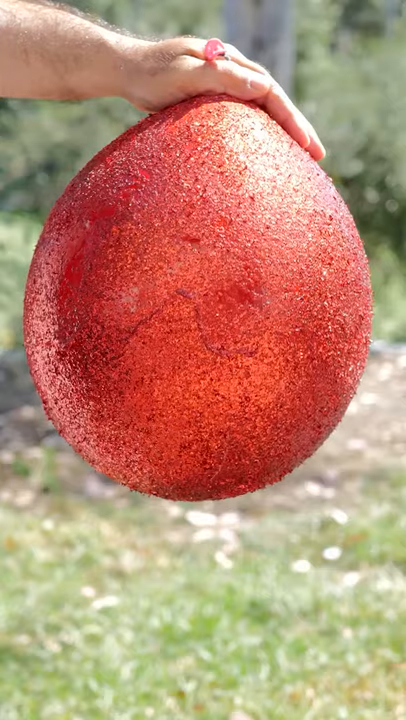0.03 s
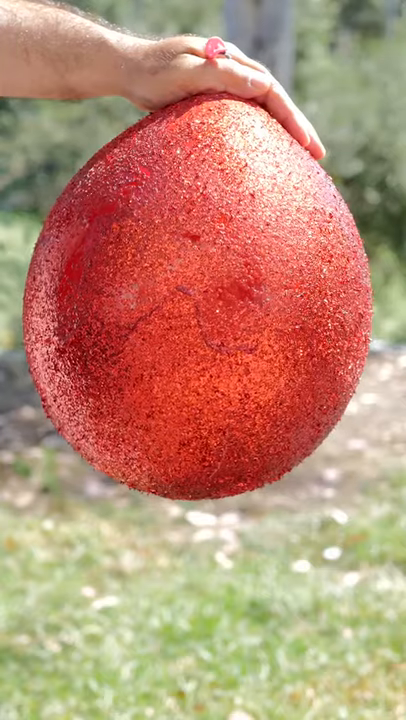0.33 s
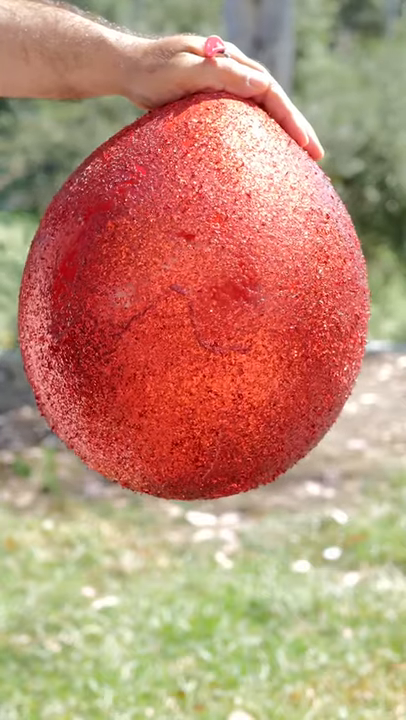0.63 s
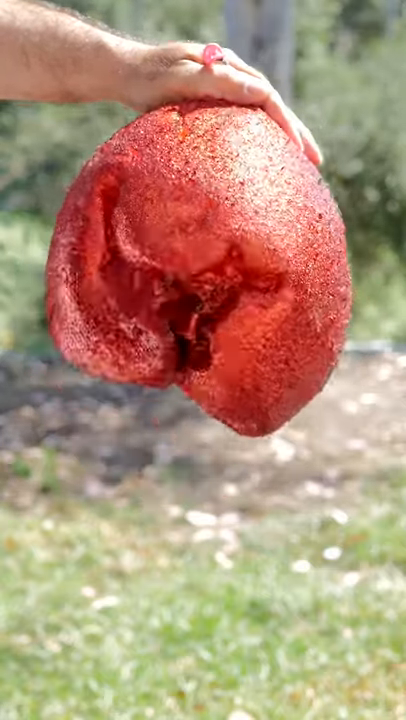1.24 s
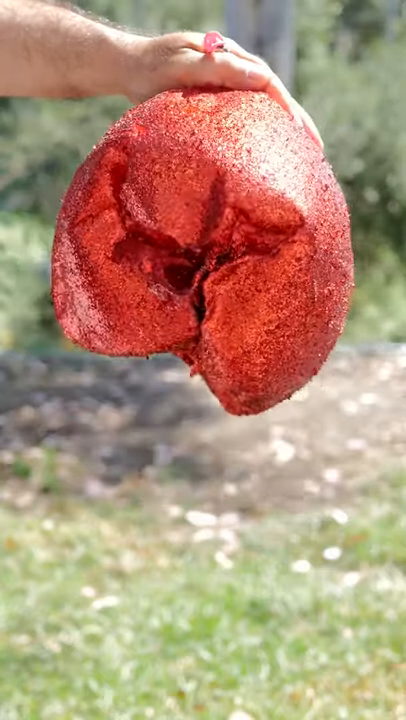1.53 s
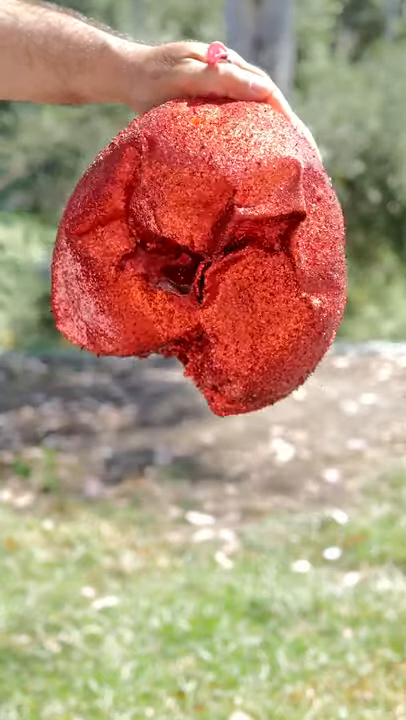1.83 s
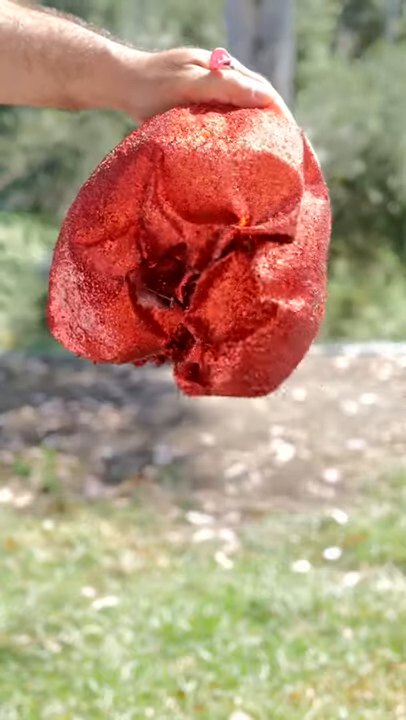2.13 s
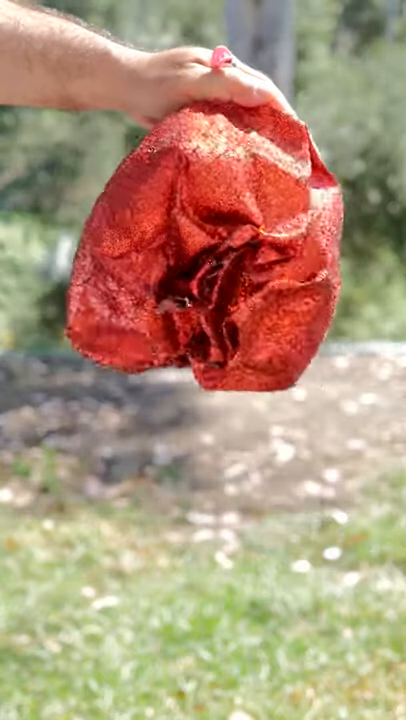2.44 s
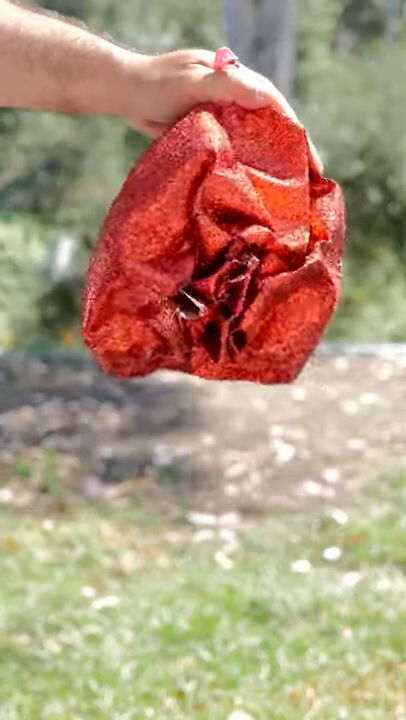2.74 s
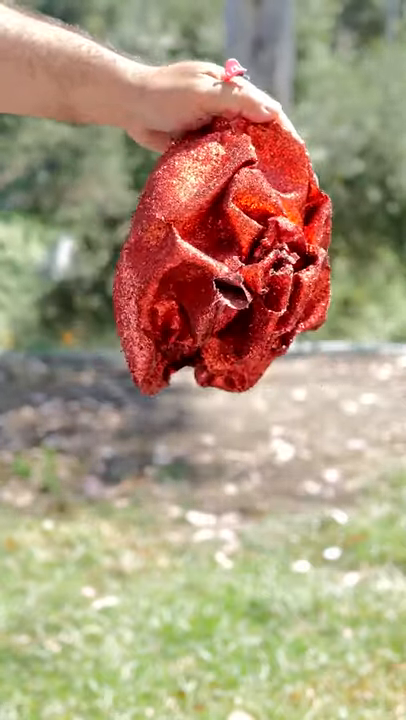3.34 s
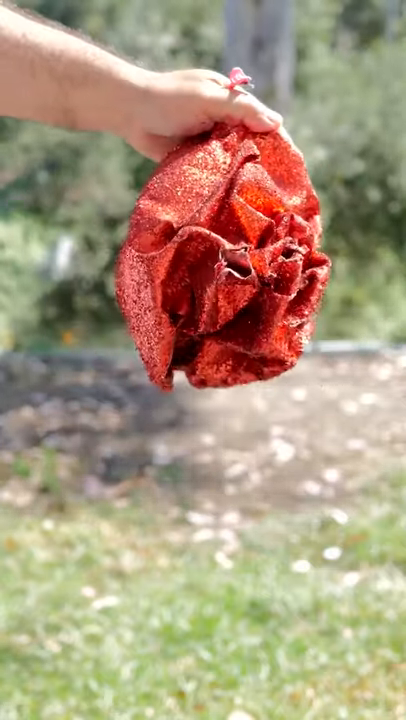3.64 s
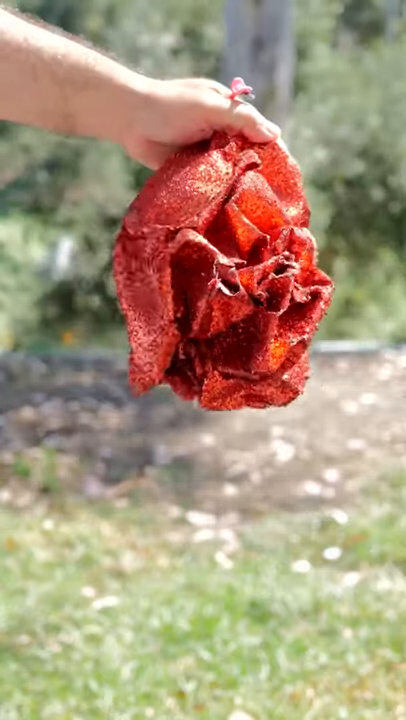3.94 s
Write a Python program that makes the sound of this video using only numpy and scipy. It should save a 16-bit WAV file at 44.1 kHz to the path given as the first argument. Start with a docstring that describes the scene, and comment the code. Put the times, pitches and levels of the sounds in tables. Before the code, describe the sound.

A glitter-coated balloon crackles and crumples close to the microphone in a garden. At first there are only faint birds, a low rumble and a soft hand bump. At 0.9 seconds it is punctured, ripping with a sharp snap just after. Dense, fine crackling continues until 4 seconds, with hollow pops of buckling folds growing from about 2 seconds. One bird chirps regularly until about 2.8 seconds.

```python
"""A garden, in stereo: birds call from the trees over a faint rumble, and a hand bumps a glitter-coated
balloon held close to the microphone. At 0.9 s it is punctured and the hole rips wider. The skin shrinks
and its stiff coating crackles in thousands of tiny fractures. Folds buckle one after another and ring
the hollow shell, more and more as it crumples from about 2 s on."""
import sys
import numpy as np
from scipy import signal
from scipy.fft import rfft, irfft, next_fast_len
from scipy.io import wavfile
from scipy.ndimage import uniform_filter1d, map_coordinates

SR = 44100
rng = np.random.default_rng(int(sys.argv[2]) if len(sys.argv) > 2 else 0)


def master_out(mix):
    """Clip the mix to full scale and print it as 16-bit PCM to the path in sys.argv[1]."""
    frames = np.transpose(np.atleast_2d(mix))
    ceiling = np.clip(frames, -1, 1)
    pcm = np.round(ceiling * 32767).astype(np.int16)
    wavfile.write(sys.argv[1], SR, pcm)


N = 176400
T = np.arange(N) / SR

# spectrum of the garden air: f/Hz, relative level/dB
AIR_SPECTRUM = [(15, -57), (30, -36), (85, -5), (117, 7), (180, -1), (344, -0.5), (1420, -7.5), (4260, -4),
                (5570, -26), (6900, -11.5), (12000, -53)]
# how alike the air is in the two channels: f/Hz, correlation
AIR_CORRELATION = [(600, 0.99), (1400, 0.54)]
# side the air leans to: f/Hz, left over right/dB
AIR_PAN = [(600, 0), (2300, -4), (7000, 12.5)]
# thin far trills: t/s, length/s, f/Hz, relative level/dB
FAR_TRILLS = [(0.203, 0.41, 3062, -48.5), (.4, 0.61, 4370, -53)]
# faint high peeps: t/s, starting f/Hz
FAR_PEEPS = [(.319, 3440), (.77, 5160)]
# slurred whistles, farther off to the right: t/s, starting f/Hz
FAR_WHISTLES = [(.19, 2200), (.2, 3100), (.352, 2390), (.415, 2433), (.49, 2340), (.622, 2130),
                (.782, 2113)]
# falling chirps of the near bird: t/s
NEAR_CHIRPS = [.236, .552, .885, 1.183, 1.496, 1.815, 2.137, 2.452, 2.775]
# bumps of the hand on the balloon: t/s, relative level/dB, fall/s
HAND_BUMPS = [(.443, -41, 0.051), (0.96, -27.5, 0.029), (1.965, -47, 0.11), (2.817, -39.5, 0.034)]
# spectrum of a bump: f/Hz, relative level/dB
BUMP_SPECTRUM = [(40, -16), (75, -0.5), (170, 5.5), (225, -4.5), (900, -34)]
# fine crackle of the shrinking skin: t/s, relative level/dB
SHRINK_LEVEL = [(.915, -69), (.926, -47), (.97, -43), (.995, -34), (1.15, -40.5), (1.25, -32.5),
                (1.52, -33.5), (1.72, -32), (1.92, -31.5), (2.04, -35), (2.15, -32), (2.48, -30.5),
                (2.68, -35.5), (2.76, -28), (3.18, -29), (3.26, -35), (3.88, -34.5), (4, -41.5)]
# coarser rustle of the creases: t/s, relative level/dB
CREASE_LEVEL = [(.91, -59), (.93, -44), (1.15, -52.5), (1.27, -46), (2.22, -43), (2.8, -37.5), (3.15, -38),
                (3.87, -39.5), (4, -44)]
# lengthening creases: t/s, length/s, starting f/Hz, relative level/dB
CREASE_RUNS = [(1.235, .12, 3170, -41), (1.539, 0.1, 3160, -41), (2.799, 0.2, 3130, -42),
               (3.075, .075, 2100, -39)]
# spectrum of the fine fractures: f/Hz, relative level/dB
CRACKLE_SPECTRUM = [(1500, -64.5), (3500, -5), (7200, -3), (9200, 4.5), (12000, 5.5), (15500, -6.5)]
# spectrum of the coarse fractures: f/Hz, relative level/dB
CRACK_SPECTRUM = [(400, -34.5), (1200, -11), (2100, 6.5), (3900, 4), (4900, -2), (12000, -4)]
# snap and rasp of the ripping skin: t/s, relative level/dB, rise/s, fall/s
RIP_BURSTS = [(1.073, -17, 0.0038, 0.0023), (1.083, -27.5, 0.018, 0.022)]
# spectrum of the rip: f/Hz, relative level/dB
RIP_SPECTRUM = [(1300, -14), (2900, 2), (4000, 10), (5400, -4.5), (9500, 6), (15500, -7)]
# cavity modes of the shell: f/Hz, relative level/dB
CAVITY_MODES = [(420, 5), (520, 2), (810, 2), (900, -1.5), (1240, -0.5), (1410, -2.5), (1600, -3),
                (2080, 8), (2380, 5), (2800, -0.5)]
# buckling folds: t/s, length/s, relative level/dB of crackle, of crack and of ring, ring centre f/Hz
BUCKLES = [(.926, .024, -52, -41, -25.5, 440), (1.001, 0.012, -25, -56, -37, 830),
           (1.534, 0.011, -25, -30, -60, 430), (1.698, 0.024, -25, -32, -56, 430),
           (1.747, .0025, -17.5, -28, -37, 2080), (1.852, 0.022, -26.5, -36, -54, 430),
           (1.9, 0.026, -21.5, -28, -30, 1450), (1.971, .013, -21, -26.5, -21.5, 406),
           (2.005, .003, -36, -32, -28, 2200), (2.099, 0.0065, -30, -51, -26.5, 478),
           (2.125, 0.0028, -17.5, -34, -34.5, 1400), (2.194, 0.0023, -38, -28.5, -20.5, 830),
           (2.274, 0.0026, -37, -28.5, -19, 1150), (2.383, 0.0049, -33, -26.5, -27.5, 1900),
           (2.483, .004, -20.5, -29, -30.5, 805), (2.552, 0.017, -44, -25.5, -29.5, 540),
           (2.582, 0.016, -20, -23.5, -24.5, 1248), (2.634, .002, -37, -28, -32.5, 830),
           (2.664, 0.0018, -33, -29, -29.5, 600), (2.715, 0.0062, -29, -26, -30.5, 1460),
           (2.871, .0026, -24, -21, -33, 2080), (2.999, .014, -44, -41, -24, 480),
           (3.108, .002, -33, -20, -20, 1900), (3.186, .002, -23, -25, -26, 1590),
           (3.234, 0.0055, -36, -23, -19.5, 2000), (3.288, 0.0084, -42, -31, -20.5, 400),
           (3.389, .001, -35, -26, -24.5, 1400), (3.417, 0.0063, -24, -25, -24, 1590),
           (3.5, 0.0034, -23.5, -22, -21, 925), (3.514, 0.0058, -29, -21, -22, 895),
           (3.53, 0.011, -30, -23, -25.5, 900), (3.799, 0.0026, -24.5, -25, -17, 700),
           (3.814, .004, -28, -23, -19, 800), (3.841, 0.063, -47, -29, -25.5, 600),
           (3.906, .003, -38, -23, -20, 867)]
# reflections of the balloon from its surroundings: f/Hz, gain/dB
REFLECTION_GAIN = [(200, -30), (1400, .5), (9000, -11)]


def amp(db):
    """Decibels to gain."""
    return 10 ** (np.asarray(db) / 20)


def unit(x):
    """Scale to rms 1."""
    return x / np.sqrt(np.mean(x ** 2) + 1e-20)


def along(points, hz):
    """Read (f/Hz, value) points on a log frequency axis."""
    f, value = np.transpose(points)
    return np.interp(np.log(hz + 1), np.log(f + 1), value)


def curve(rows):
    """Read (t/s, value) points at each sample."""
    return np.interp(T, *np.transpose(rows))


def wobble(rate):
    """A smooth random curve with rate knots a second."""
    return map_coordinates(rng.standard_normal(int(N * rate / SR) + 4), [T * rate])


def filtered(x, response):
    """Apply a gain given as a function of frequency."""
    size = next_fast_len(N + SR // 4)
    return irfft(rfft(x, size) * response(np.fft.rfftfreq(size, 1 / SR)), size)[..., :N]


def convolved(x, impulse):
    """Every sample of x sets off the impulse response; channels come as rows."""
    return signal.oaconvolve(np.atleast_2d(x), np.atleast_2d(impulse), axes=1)[:, :N]


def coloured(x, spectrum, size=2048):
    """Pass x through a causal filter of unit energy with the given spectrum."""
    cepstrum = irfft(np.log(amp(along(spectrum, np.fft.rfftfreq(size, 1 / SR)))))
    cepstrum[1:size // 2] *= 2  # minimum phase keeps attacks sharp
    cepstrum[size // 2 + 1:] = 0
    impulse = irfft(np.exp(rfft(cepstrum)))
    return convolved(x, impulse / np.linalg.norm(impulse))


def panned(x, pan_db):
    """Place a sound; positive is left of the microphone."""
    return x * amp([[pan_db / 2], [-pan_db / 2]])


def burst(t, hold, rise, fall):
    """Exponential rise before time 0, hold, exponential fall; all in seconds."""
    return np.exp(np.minimum(t, 0) / rise - np.maximum(t - hold, 0) / fall)


def add(track, start_s, sound):
    """Mix a sound into a track."""
    part = track[max(round(start_s * SR), 0):][:len(sound)]
    part += sound[:len(part)]


def echoes(x, t60):
    """Diffuse stereo reflections that fall 60 dB in t60 seconds."""
    t = np.arange(SR // 3) / SR
    tail = rng.standard_normal((2, len(t))) * amp(-60 * t / t60)
    return convolved(x, tail / np.linalg.norm(tail[0]))


def garden(level_db=-49.5):
    """Outdoor air around the microphone: a faint central rumble under a wider hiss."""
    def mid_side_gains(hz):
        angle = np.arccos(along(AIR_CORRELATION, hz)) / 2
        return amp(along(AIR_SPECTRUM, hz)) * [np.cos(angle), np.sin(angle)]

    mid, side = filtered(rng.standard_normal((2, N)), mid_side_gains)
    left_right = np.array([mid + side, mid - side])
    air = filtered(left_right, lambda hz: amp(np.outer([.5, -.5], along(AIR_PAN, hz))))
    return amp(level_db) * unit(air)


def bird_note(length, from_hz, to_hz, rough, bend=1):
    """One wavering whistled glide that swells quickly and fades."""
    samples = int(length * SR)
    progress = np.arange(samples) / samples
    waver = map_coordinates(rng.standard_normal(256), [progress * length * 400], mode="wrap")
    hz = (from_hz + (to_hz - from_hz) * progress ** bend) * (1 + rough * waver)
    swell = np.sqrt(2 * np.abs(np.sin(np.pi * progress ** .65)))
    return swell * np.sin(2 * np.pi * np.cumsum(hz) / SR)


def birds():
    """A near bird chirps, others whistle farther off; peeps and trills arrive only as tree echoes."""
    near, far, thin = np.zeros((3, N))
    for start in NEAR_CHIRPS:
        add(near, start, amp(-44) * bird_note(.054, from_hz=4150, to_hz=2400, rough=.02, bend=1.6))
    for start, hz in FAR_WHISTLES:
        add(far, start, amp(-53) * bird_note(.072, hz, .76 * hz, rough=.02))
    for start, hz in FAR_PEEPS:
        add(thin, start, amp(-47) * bird_note(.0492, hz, .88 * hz, rough=.035, bend=.99))
    for start, length, hz, db in FAR_TRILLS:
        add(thin, start, amp(db) * bird_note(length, hz, hz, rough=.011))
    return near + panned(far, pan_db=-13.5) + echoes(near + far + thin, t60=.3)


def hand_bumps(cutoff_hz=260):
    """Soft low thuds of the balloon in the hand."""
    noise = signal.hilbert(coloured(rng.standard_normal(N), BUMP_SPECTRUM)[0])
    evened = unit(noise.real / np.abs(noise) ** .5)
    shape = sum(amp(db) * burst(T - start, hold=.0017, rise=.009, fall=fall)
                for start, db, fall in HAND_BUMPS)
    thuds = filtered(shape * evened, lambda hz: 1 / (1 + (hz / cutoff_hz) ** 6))
    return panned(thuds, pan_db=-3)


def fractures(rate, size_db, spread):
    """Stereo train of tiny snaps, rate a second, of random size and direction; rms 1."""
    size = amp(size_db * np.clip(rng.standard_normal(N), -2, 2)) * rng.choice([-1, 1], N)
    snaps = size * (rng.random(N) < rate / SR)
    side = spread * rng.standard_normal(N)
    return unit(snaps * np.array([1 + side, 1 - side]))


def facets(pitch, spread_oct, rate=480, size_db=3.5, t60=.02):
    """Small facets of the coating flip, each with a papery ring near the pitch of the moment; rms 1."""
    rings = np.zeros(len(pitch))
    t = np.arange(SR // 20) / SR
    starts = np.flatnonzero(rng.random(len(pitch)) < rate / SR)
    detune, sizes = rng.standard_normal((2, len(pitch)))
    for i in starts:
        hz = pitch[i] * 2 ** (spread_oct * detune[i])
        decay = amp(size_db * sizes[i] - 60 * t / t60)
        add(rings, i / SR, decay * np.sin(2 * np.pi * hz * t))
    return unit(rings)


def crinkles(centre_hz=2900, pitch_fall=.76):
    """Scattered crinkles follow the creasing; runs sink in pitch as a crease lengthens."""
    crinkle = facets(np.full(N, centre_hz), spread_oct=.33) * amp(curve(CREASE_LEVEL) - 4)
    for start, length, hz, db in CREASE_RUNS:
        progress = np.arange(int(length * SR)) / (length * SR)
        run = facets(hz * pitch_fall ** progress, spread_oct=.09)
        add(crinkle, start, amp(db) * signal.windows.tukey(len(run)) * run)
    return panned(crinkle, pan_db=-3.5)


def coating():
    """The stiff coating fractures on the shrinking skin: fine crackle and coarser rustle, in clumps."""
    clumps_db = 1.5 * wobble(rate=45)
    fine = fractures(rate=6500, size_db=3.3, spread=.067) * amp(curve(SHRINK_LEVEL) + clumps_db)
    coarse = fractures(rate=2500, size_db=2.5, spread=.44) * amp(curve(CREASE_LEVEL) + clumps_db)
    crackle = coloured(fine, CRACKLE_SPECTRUM)
    rustle = coloured(coarse, CRACK_SPECTRUM)
    return panned(crackle, pan_db=1.3) + panned(rustle, pan_db=-1.5)


def rip():
    """The hole tears wider with one sharp snap and a short rasp."""
    shape = sum(amp(db) * burst(T - start, 0, rise, fall) for start, db, rise, fall in RIP_BURSTS)
    tearing = shape * fractures(rate=16000, size_db=3, spread=.085)
    return panned(coloured(tearing, RIP_SPECTRUM), pan_db=-2)


def shell_knock(centre_hz, focus_db=12, focus_oct=.42, scatter_db=3, drift=.022, lowest_t60=.1):
    """One knock on the cavity: modes near centre_hz are lifted, and high ones die sooner."""
    t = np.arange(SR // 8) / SR
    hz, db = np.transpose(CAVITY_MODES)
    lift_db = focus_db * np.exp(-(np.log2(hz / centre_hz) / focus_oct) ** 2)
    db = db + scatter_db * rng.standard_normal(len(hz)) + lift_db
    hz = hz * (1 + drift * rng.standard_normal(len(hz)))  # modes shift with the shell's shape
    decay = amp(db[:, None] - 60 * np.outer(np.sqrt(hz / hz[0]), t) / lowest_t60)
    cycles = np.outer(hz, t) + rng.random((len(hz), 1))
    ring = np.sum(decay * np.sin(2 * np.pi * cycles), axis=0)
    return signal.sosfilt(signal.butter(N=3, Wn=320, btype="high", fs=SR, output="sos"), ring)


def crumple(start_s=1.9, level_db=-49):
    """Once the shell has caved in, small folds keep tapping its cavity."""
    taps = fractures(rate=170, size_db=0, spread=.078)
    ring = unit(convolved(taps, shell_knock(centre_hz=430)))
    return ring * (T > start_s) * amp(level_db)


def shell_ring(push, centre_hz):
    """The hollow shell rung by one fold; its loudest moment has rms 1."""
    ring = signal.fftconvolve(push, shell_knock(centre_hz))[:len(push)]
    return ring / np.sqrt(uniform_filter1d(ring ** 2, size=180).max())


def folds(snap_db=4, snap_s=.0022, kick=40):
    """Each fold gives way in an avalanche of fractures, with a crack and a hollow ring."""
    fine, coarse, hollow = np.zeros((3, N))
    t = np.arange(-SR // 100, SR // 8) / SR
    for start, length, crackle_db, crack_db, ring_db, hz in BUCKLES:
        accent = amp(snap_db * np.exp(-np.abs(t) / snap_s))
        shape = burst(t, length, rise=.0013, fall=.0065) * accent
        push = kick * (t == 0) + shape * rng.standard_normal(len(t))  # first snap plus fractures
        add(fine, start + t[0], amp(crackle_db - 5) * shape)
        add(coarse, start + t[0], amp(crack_db - 5.5) * shape)
        add(hollow, start + t[0], amp(ring_db - 6.5) * shell_ring(push, hz))
    crackle = coloured(fine * fractures(rate=12000, size_db=7.5, spread=.067), CRACKLE_SPECTRUM)
    crack = coloured(coarse * fractures(rate=6000, size_db=3.5, spread=.12), CRACK_SPECTRUM)
    return panned(crackle, pan_db=1) + panned(crack, pan_db=-1.5) + panned(hollow, pan_db=-.5)


def scene():
    """The balloon close to the microphone with brief reflections, birds and garden behind."""
    balloon = coating() + crinkles() + folds() + crumple() + rip() + hand_bumps()
    reflected = filtered(echoes(balloon, t60=.15), lambda hz: amp(along(REFLECTION_GAIN, hz)))
    return balloon + reflected + birds() + garden()


def record(dry):
    """Sound starts after a moment of silence; nothing passes above the band limit."""
    start_s, top_hz = .197, 15900
    return filtered(dry * (T >= start_s), lambda hz: hz < top_hz)


dry = scene()
out = record(dry)
master_out(out)
```